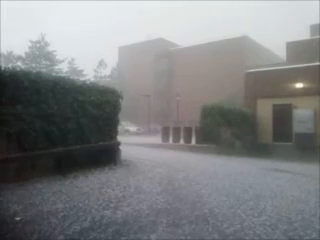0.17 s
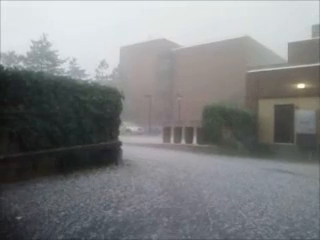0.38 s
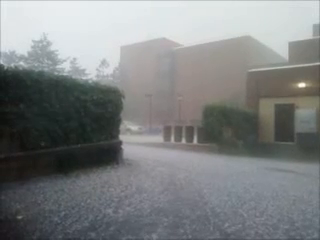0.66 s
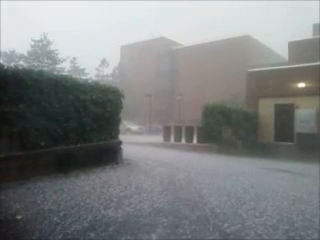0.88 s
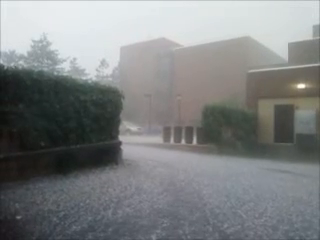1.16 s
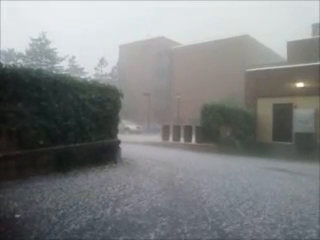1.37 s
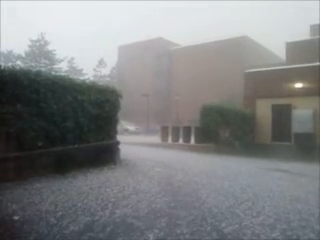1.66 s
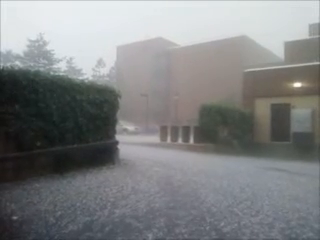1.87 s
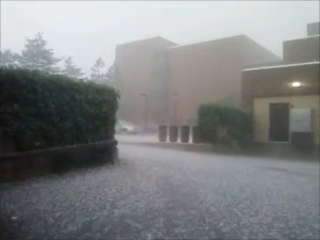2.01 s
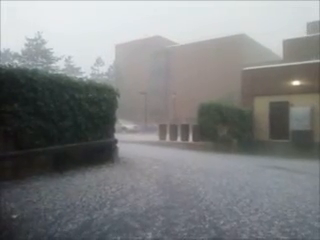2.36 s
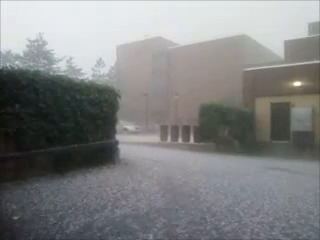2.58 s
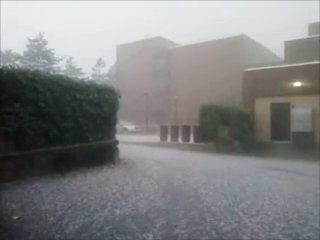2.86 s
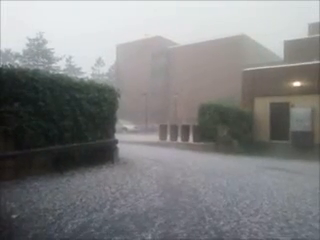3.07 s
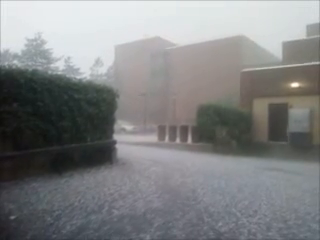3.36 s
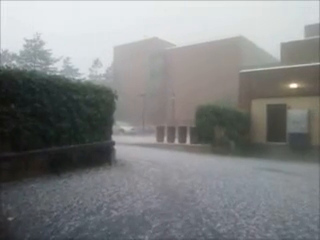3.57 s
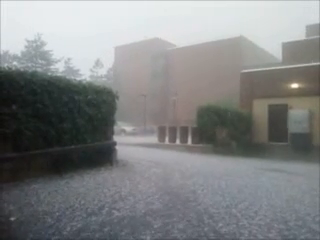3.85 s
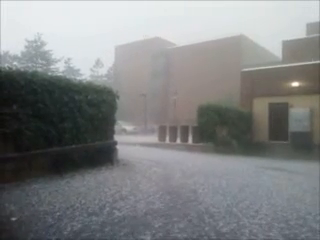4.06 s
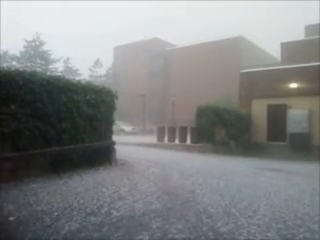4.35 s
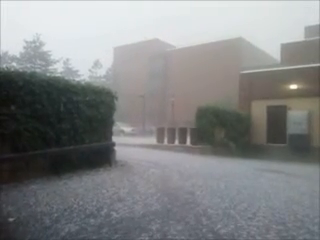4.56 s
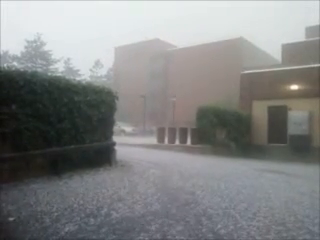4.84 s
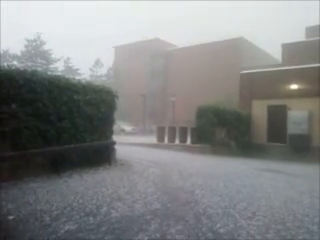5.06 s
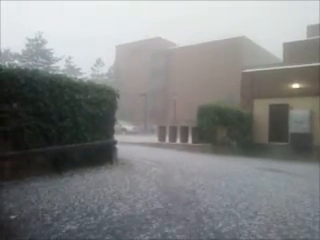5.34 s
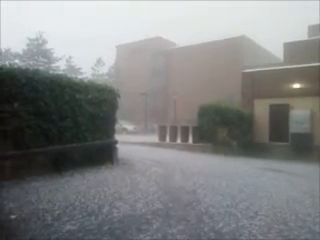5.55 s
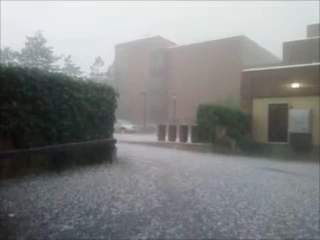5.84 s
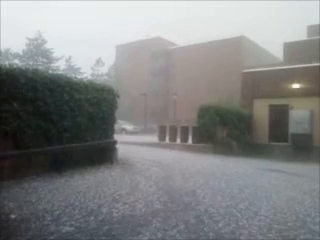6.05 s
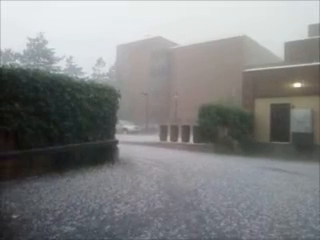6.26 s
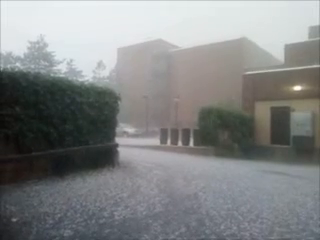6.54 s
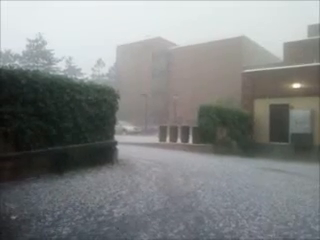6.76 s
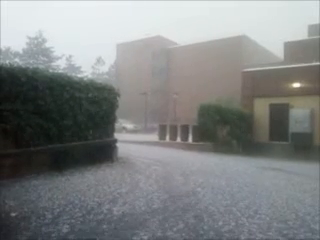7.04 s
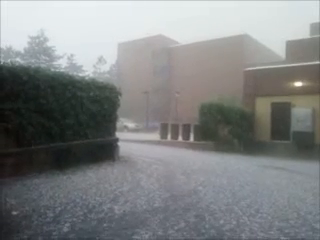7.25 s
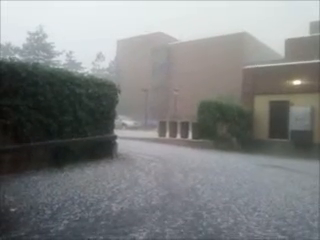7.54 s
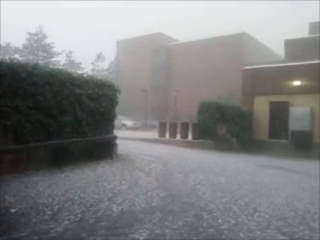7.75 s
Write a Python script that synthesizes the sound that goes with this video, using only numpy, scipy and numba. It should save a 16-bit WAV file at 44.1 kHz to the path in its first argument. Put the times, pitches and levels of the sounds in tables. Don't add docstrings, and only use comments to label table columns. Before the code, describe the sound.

A loud, constant roar of hailstones on wet pavement, heard through a phone-like microphone, grainy and distorted with irregular clicks and crackles.

```python
import sys
import numpy as np
from scipy import signal
from scipy.fft import irfft, next_fast_len
from scipy.io import wavfile
from scipy.ndimage import uniform_filter1d, minimum_filter1d
from numba import njit

SR = 44100
rng = np.random.default_rng(int(sys.argv[2]) if len(sys.argv) > 2 else 0)


def inscribe(sig):
    pcm = np.round(np.clip(np.atleast_2d(sig).T, -1, 1) * 32767)
    wavfile.write(sys.argv[1], SR, pcm.astype(np.int16))


def gain_from_db(level_db):
    decades = np.asarray(level_db, float) / 20
    return 10 ** decades


N = 347461

# time [s], hiss level [dB], far dull share of the fall [dB],
# bright ring of the paving [Hz].
STORM = [(0, -14, -9.5, 2820), (.7, -14.5, -6.5, 2930), (1.3, -15.5, -7.5, 2744), (1.38, -13.5, -12, 2950),
         (1.55, -15, -9, 2810), (2.45, -15, -5, 2720), (2.65, -14.5, -9.5, 2820), (3.1, -15.5, -7, 2860),
         (3.55, -14.5, -9, 2875), (4., -15, -8, 2830), (4.75, -14.5, -11, 2857), (4.9, -16, -7, 2773),
         (5.15, -13.5, -9.5, 2750), (5.56, -16, -2.5, 2730), (5.65, -14.5, -8, 2710), (6.45, -15, -8, 2740),
         (7.05, -15.5, -8, 3000), (7.7, -15, -9.5, 2930)]
# frequency [Hz], gain [dB].
MICROPHONE_TONE = [(12, -60), (20, -25.5), (33, -29), (124, -28), (277, -27), (528, -21), (616, -17.5),
                   (674, -15.5), (941, -10), (1180, -6), (1790, -9.5), (2400, -4), (2680, 1), (3350, -3.5),
                   (4090, -32), (5320, -58.5), (9000, -120)]
# time [s], thump [dB].
GUSTS = [(.01, 0.5), (.55, 1), (1.14, 5.5), (1.35, 4.5), (1.62, 2), (2.02, 5.5), (2.47, 3.5), (2.82, 7.5),
         (3.04, 1.5), (4.07, 5), (4.479, 2), (5.48, 4.5), (5.6, -1), (5.89, 0.5), (6.22, 2.5), (6.412, 4.5),
         (6.65, 0), (7.1, 6.5), (7.43, 3), (7.82, 1)]
# time [s], crackle [dB].
HARD_STONES = [(.6282, -18), (.669, -27), (.7965, -22.5), (.8, -23.5), (.928, -27), (.9344, -19.5),
               (1.1448, -24.5), (1.2422, -22.5), (1.4852, -25.5), (1.5125, -22.5), (1.8985, -25.5),
               (2.0508, -23), (2.3966, -19.5), (2.5472, -12), (2.8271, -28), (4.0742, -27.5),
               (4.501, -26.5), (4.5474, -20.5), (4.7448, -27.5), (4.8639, -18), (5.0805, -24),
               (5.251, -26.5), (6.0714, -25.5), (6.6587, -17.5), (6.8096, -26), (6.8178, -22),
               (6.825, -13.5), (6.8422, -25), (7.8253, -18.5), (7.839, -8)]
# time [s], crackle [dB].
VOLLEY = [
    (2.1715, -17.5),
    (2.181, -22),
    (2.1843, -23),
    (2.1888, -12.5),
    (2.1962, -25),
    (2.199, -16.5),
    (2.2084, -29),
    (2.2133, -22),
    (2.217, -27.5),
]
# time [s], crackle [dB].
LONE_STONES = [(0.1725, -35), (0.3135, -44), (.537, -42), (0.5959, -32.5), (.7021, -30), (1.2266, -32.5),
               (1.321, -34.5), (1.3881, -36), (1.6581, -37), (1.6778, -48), (2.0732, -31), (2.0878, -36.5),
               (2.3078, -37), (2.33, -38), (2.418, -36), (2.7102, -55.5), (3.3421, -46), (3.936, -53.5),
               (4.586, -33.5), (4.6507, -31.5), (5.165, -41), (5.349, -32.5), (6.0465, -35.5),
               (6.1383, -43.5), (6.293, -38.5), (6.545, -41), (6.6449, -32.5), (6.884, -42.5),
               (7.2411, -57.5), (3.0838, -55.5)]
# start [s], length [s], gap between stones [s], crackle [dB].
FLURRIES = [(.638, .002, .026, -38), (0.6974, .024, .0195, -39.5), (.757, .03, 0.025, -42.5),
            (.832, .016, .006, -41.5), (1.22, .06, .05, -42.5), (1.349, .045, 0.044, -43),
            (1.459, .032, .027, -42), (2.138, .075, .017, -46.5), (2.406, .008, .005, -39),
            (2.875, .028, .008, -43), (3.165, .014, .01, -40), (3.207, .007, 0.0036, -39),
            (3.697, .034, .0135, -31.5), (4.51, .038, .007, -33), (4.683, .01, .0066, -35.5),
            (4.724, .018, .013, -37), (4.76, .002, .03, -54.5), (4.822, .07, .028, -47),
            (5.032, .024, 0.018, -42.5), (5.093, .002, .03, -53.5), (5.317, .022, 0.0082, -43),
            (6.627, .035, .027, -50.5), (6.828, .036, .011, -33), (7.532, .016, 0.012, -40.5),
            (7.586, .002, .03, -54.5), (7.785, .055, .022, -36.5)]

CEILING = .712
LINK_SR, BLOCK = 8000, 40
FRAMES = dict(nperseg=128, noverlap=96)

MIDDLE_HZ, MIDDLE_WANDER_HZ = 2690, 37
UPPER_HZ, UPPER_WANDER_HZ = 3400, 60
LOWER_HZ, LOWER_WANDER_HZ = 1400, 52
WANDER_PER_S, LEVEL_WANDER_DB, LOWER_WANDER_DB, RUMBLE_WANDER_DB = 16, .3, .8, 1.4
RUMBLE_FOLLOWS, MIDDLE_FOLLOWS = .27, .4
SURGE_DB, SURGE_S, SURGE_SLOPE = .5, .035, .4
GUST_S = .043

RING_MS, VOLLEY_RING_MS, HARD_RING_MS, RING_SPREAD_HZ = 1.3, 2.2, 1.05, 44
GAP_JITTER, FLURRY_SPREAD_DB = .15, 1
GRAZE_DB, GRAZE_SPREAD_DB, GRAZE_WITHIN_S = -60, 4.5, .01


def evened(x):
    return x / np.sqrt(np.mean(x ** 2) + 1e-20)


def wander(t):
    knots = rng.standard_normal(200)
    return evened(np.interp(t * WANDER_PER_S, np.arange(len(knots)), knots))


@njit
def repeat(pulses, lags, shares, gains, block):
    out = pulses.copy()
    for b in range(5, len(lags)):
        a = b * block
        end = a + block
        for i in range(a, end):
            out[i] = out[i - lags[b]]
        old = np.sqrt(np.mean(out[a:end] ** 2)) + 1e-9
        fresh = np.sqrt(1 - shares[b] ** 2) * pulses[a:end]
        out[a:end] = gains[b] * (shares[b] * out[a:end] / old + fresh)
    return out


def patter(blocks, density=.2, flicker_db=1.48):
    count = blocks * BLOCK
    signs = rng.choice([-1., 1.], count)
    pulses = signs * (rng.random(count) < density) / np.sqrt(density)
    lags = rng.integers(20, 144, blocks)
    shares = np.clip(.87 + .07 * rng.standard_normal(blocks), 0, .96)
    gains = gain_from_db(flicker_db * rng.standard_normal(blocks))
    return repeat(pulses, lags, shares, gains, BLOCK)


def gust_thumps(t):
    return sum(db * np.exp(-.5 * ((t - s) / GUST_S) ** 2) for s, db in GUSTS)


def controls(t, stones):
    times, *curves = np.transpose(STORM)
    steady_db, far_db, ring_hz = (np.interp(t, times, curve) for curve in curves)
    closeness = np.exp(-.5 * ((t - stones[:, :1]) / SURGE_S) ** 2)
    near = gain_from_db(SURGE_SLOPE * (stones[:, 1:2] + 18.5)) * closeness
    bright_db = SURGE_DB * np.log(1 + near.sum(0)) + LEVEL_WANDER_DB * wander(t)
    bright_db = bright_db - bright_db.mean()
    middle = MIDDLE_HZ + MIDDLE_WANDER_HZ * wander(t)
    upper = UPPER_HZ + UPPER_WANDER_HZ * wander(t)
    lower = LOWER_HZ + LOWER_WANDER_HZ * wander(t)
    middle = middle + MIDDLE_FOLLOWS * (ring_hz - ring_hz.mean())
    lower_rel_db = far_db - bright_db + LOWER_WANDER_DB * wander(t)
    rumble_rel_db = RUMBLE_FOLLOWS * far_db - bright_db + RUMBLE_WANDER_DB * wander(t)
    rumble_rel_db = rumble_rel_db + gust_thumps(t)
    return steady_db + bright_db, middle, upper, lower_rel_db, lower, rumble_rel_db


def drifting(x, stones, split_hz=1900, rumble_hz=480, patchy_db=1.68):
    hz, t, z = signal.stft(x, LINK_SR, **FRAMES)
    level_db, middle, upper, lower_rel_db, lower, rumble_rel_db = controls(t, stones)
    hz = hz[:, None]
    low_side = 1 / (1 + (hz / split_hz) ** 8)
    rumble_side = 1 / (1 + (hz / rumble_hz) ** 6)
    field_db = level_db + (low_side - rumble_side) * (lower_rel_db - lower_rel_db.mean())
    field_db += rumble_side * (rumble_rel_db - rumble_rel_db.mean())
    for centre, db, width in ((upper, 5, 160), (middle, 5, 180), (lower, 3, 280)):
        bump_db = db * np.exp(-.5 * ((hz - centre) / width) ** 2)
        field_db = field_db + bump_db - bump_db.mean(1, keepdims=True)
    patches = rng.standard_normal(z.shape[::-1]).T
    patches = uniform_filter1d(patches, size=4, axis=0)
    patches = uniform_filter1d(patches, size=7, axis=1)
    shaped = z * gain_from_db(field_db + patchy_db * evened(patches))
    return signal.istft(shaped, LINK_SR, **FRAMES)[1][:len(x)]


def upsampled(x):
    size = len(x) * SR // LINK_SR
    hz = np.fft.rfftfreq(size, 1 / SR)
    tone_hz, tone_db = np.transpose(MICROPHONE_TONE)
    gain = gain_from_db(np.interp(np.log(hz + 1), np.log(tone_hz + 1), tone_db))
    band = (hz > 2000) & (hz < 3800)
    gain /= np.sqrt(2 * np.sum(gain[band] ** 2) / len(x))
    images = np.resize(np.fft.fft(x), len(hz))
    return irfft(images * gain, size)[:N] * size / len(x)


def held_down(x, top):
    envelope = abs(signal.hilbert(x, next_fast_len(N))[:N])
    gain = np.minimum(1, top / (envelope + 1e-9))
    gain = minimum_filter1d(gain, size=81)
    return x * uniform_filter1d(uniform_filter1d(gain, size=41), size=41)


def flurry_stones():
    rows = []
    for start, length, gap, db in FLURRIES:
        place, size = rng.uniform(-1, 1, (2, 8))
        for step, p, q in zip(gap * np.arange(8), place, size):
            if step <= length:
                late = GAP_JITTER * gap * p * (step > 0)
                rows.append((start + step + late, db + FLURRY_SPREAD_DB * q, RING_MS))
    return rows


def near_stones():
    rows = [(s, db, RING_MS) for s, db in LONE_STONES]
    rows += [(s, db, HARD_RING_MS) for s, db in HARD_STONES]
    rows += [(s, db, VOLLEY_RING_MS) for s, db in VOLLEY]
    rows += flurry_stones()
    grazes = rng.uniform(-1, 1, (len(HARD_STONES), 2))
    rows += [(s + GRAZE_WITHIN_S * p, GRAZE_DB + GRAZE_SPREAD_DB * q, RING_MS)
             for (s, _), (p, q) in zip(HARD_STONES, grazes)]
    s, crackle_db, ms = np.transpose(rows)
    spread = rng.standard_normal(256)[:len(s)]
    ring_hz = np.interp(s, *np.transpose(STORM)[[0, -1]]) + RING_SPREAD_HZ * spread
    return np.transpose([s, crackle_db, ring_hz, ms])[np.argsort(crackle_db)]


def with_stones(wash, stones, excess=.33, split_hz=2100):
    low = signal.oaconvolve(wash, signal.firwin(201, split_hz, fs=SR), "same")
    out = wash.copy()
    for s, crackle_db, ring_hz, ms in stones:
        half = max(ms, .5)
        t = np.arange(-half, half, 1000 / SR) / 1000
        at = round((s + t[0]) * SR) + np.arange(len(t))
        shape = np.cos(np.pi * t / (2 * -t[0])) ** 2
        ring = CEILING * rng.choice([-1, 1]) * np.cos(2 * np.pi * ring_hz * t)
        struck = (1 - shape) * out[at] + shape * (low[at] + ring)
        height = CEILING * (1 + excess * gain_from_db((crackle_db + 20) * .7))
        lift = height / np.max(abs(struck) * shape ** .25)
        out[at] = struck * (1 + shape * (lift - 1))
    return out


def scene():
    stones = near_stones()
    blocks = 2 * (N * LINK_SR // SR // BLOCK // 2 + 1)
    hiss = drifting(evened(patter(blocks)), stones)
    wash = upsampled(hiss) * gain_from_db(-.21)
    return with_stones(held_down(wash, .67), stones)[None]


def top_cut(x):
    return signal.sosfilt(signal.butter(12, 15870, fs=SR, output="sos"), x)


def record(dry):
    band_edge = signal.firwin(401, 4560, window=("kaiser", 8), fs=SR)
    narrow = signal.oaconvolve(dry, band_edge[None], "same")
    return top_cut(np.clip(narrow, -CEILING, CEILING))


dry = scene()
out = record(dry)
inscribe(out)
```